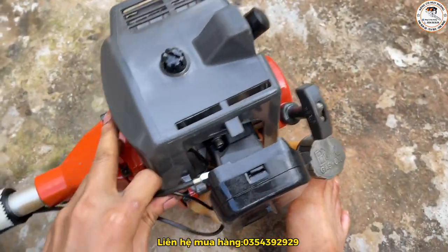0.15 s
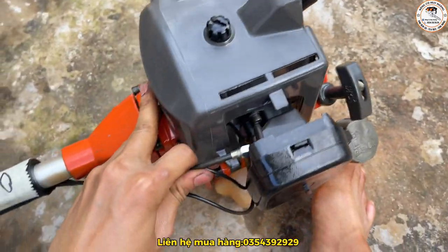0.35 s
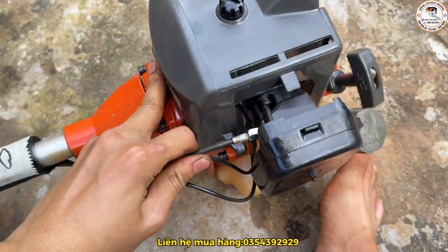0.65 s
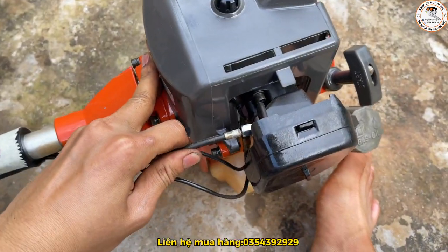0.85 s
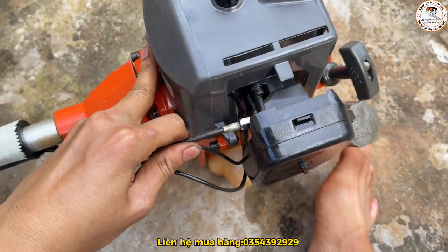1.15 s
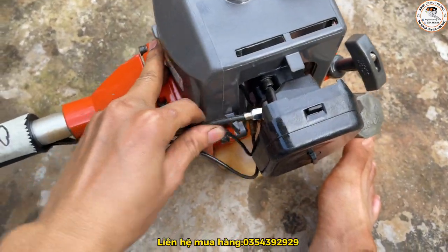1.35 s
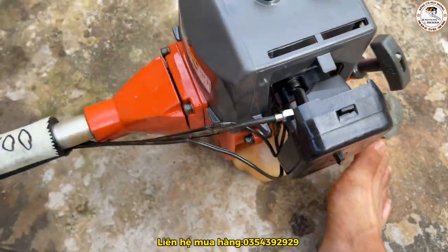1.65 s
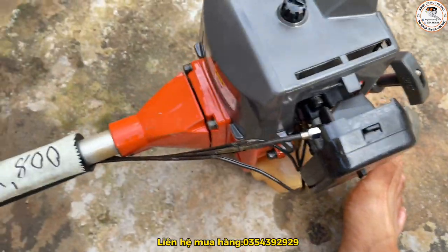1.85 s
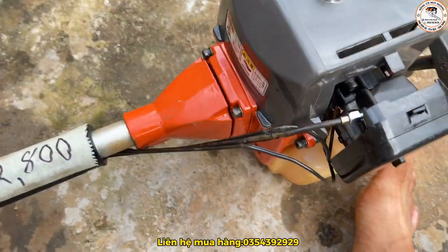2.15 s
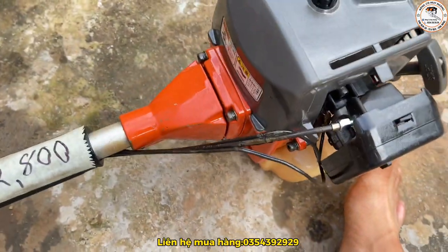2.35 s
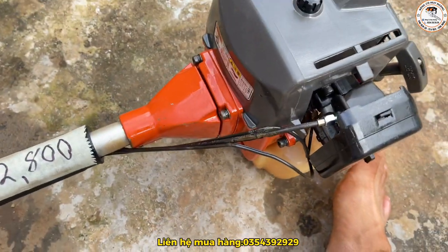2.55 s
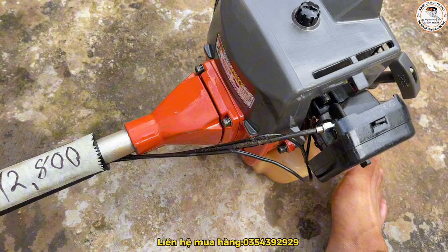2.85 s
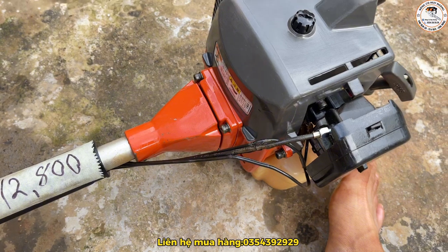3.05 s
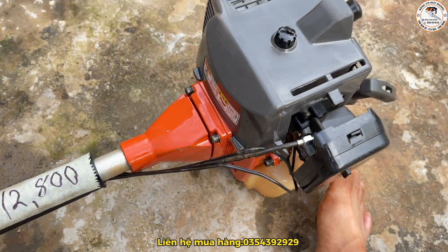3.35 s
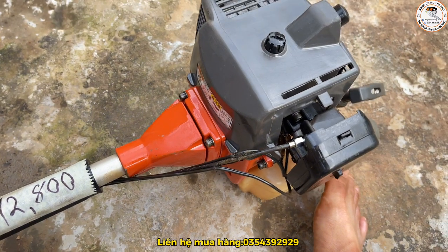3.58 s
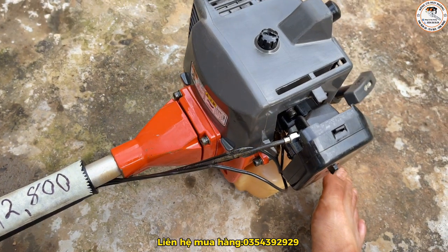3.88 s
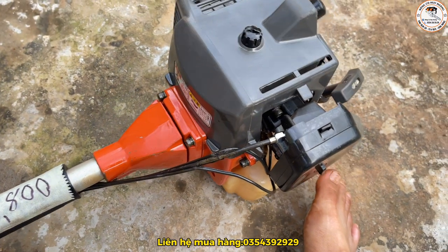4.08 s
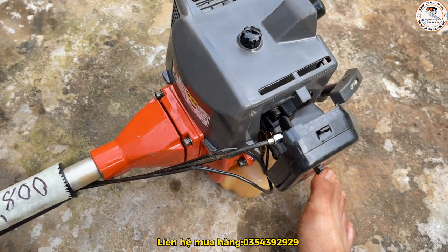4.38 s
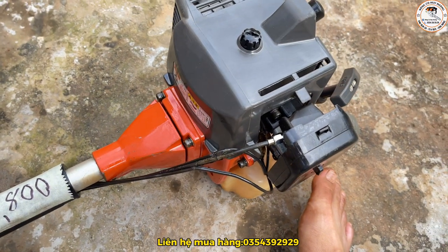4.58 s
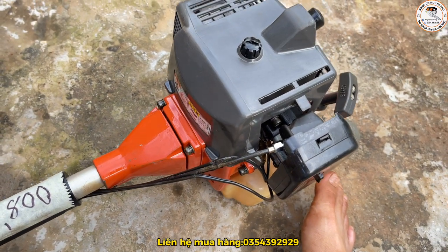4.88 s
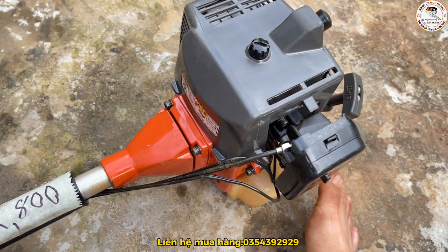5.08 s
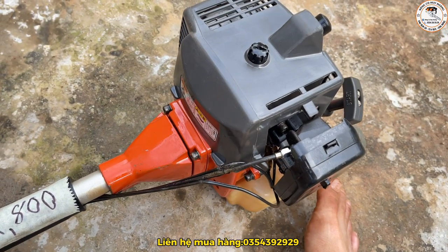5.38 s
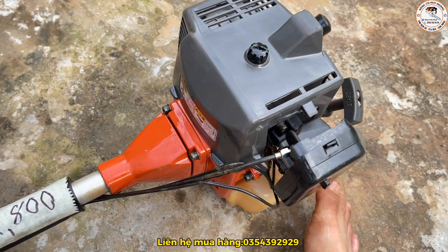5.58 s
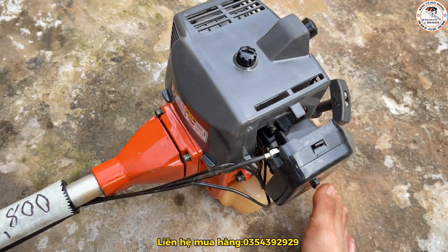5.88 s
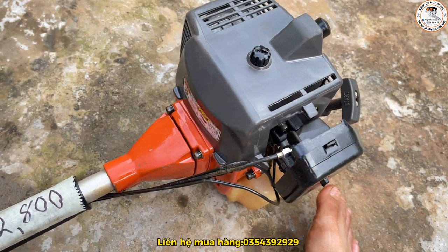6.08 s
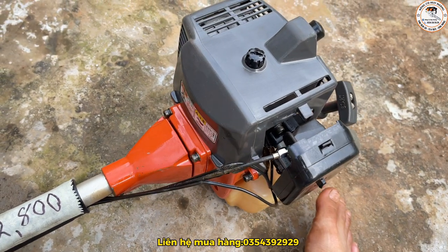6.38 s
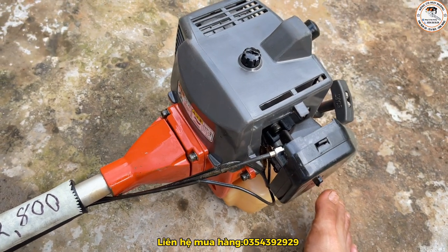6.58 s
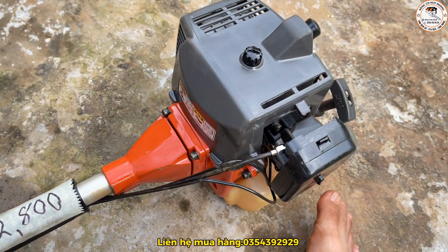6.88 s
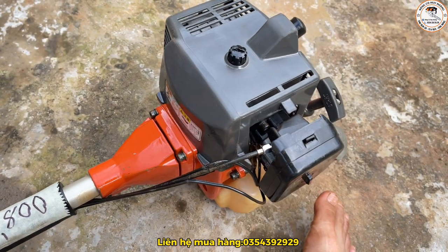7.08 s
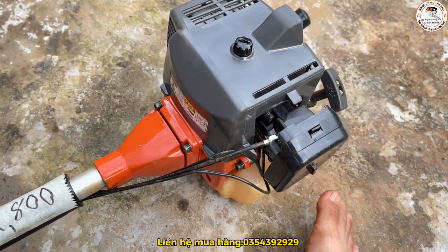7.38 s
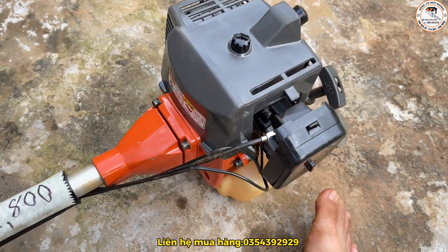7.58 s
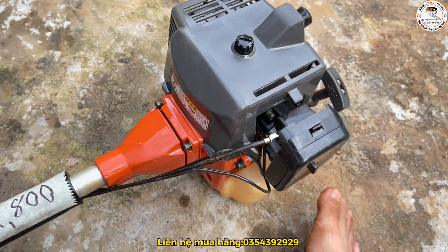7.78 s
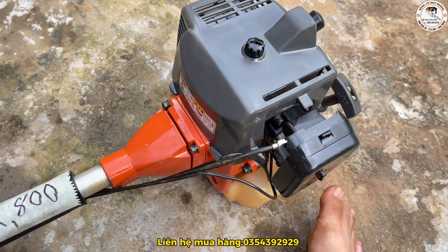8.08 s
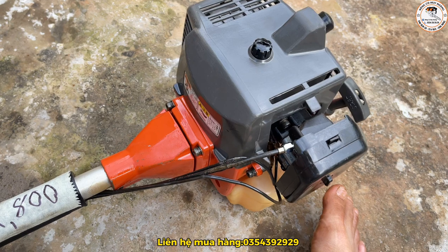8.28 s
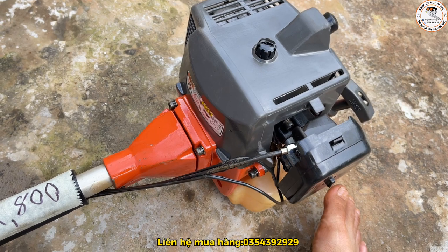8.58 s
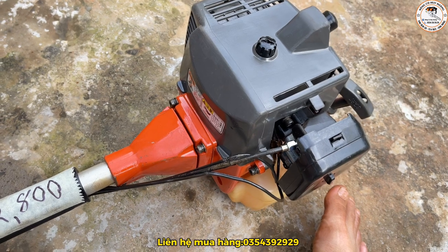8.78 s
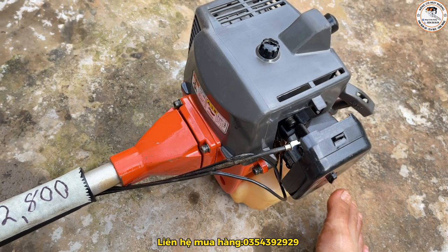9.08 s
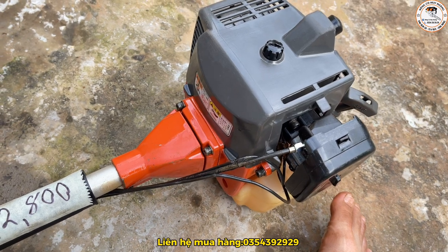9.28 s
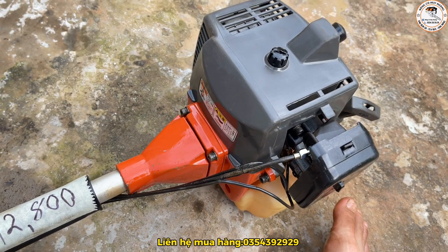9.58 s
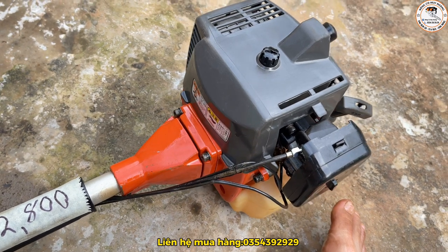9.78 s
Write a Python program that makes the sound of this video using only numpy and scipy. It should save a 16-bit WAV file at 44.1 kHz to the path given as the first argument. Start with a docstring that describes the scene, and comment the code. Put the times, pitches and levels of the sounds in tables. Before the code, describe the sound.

A small two-stroke brush cutter engine pops unevenly at idle, revs briefly, sinks to sputtering, then is opened up four times into a buzzing scream.

```python
"""On a concrete yard, a small two-stroke brush cutter is heard from close above.
It idles with uneven pops, is revved, sinks back, then is opened up four times and held at speed.
During parts of these runs it skips firings in a pattern, which adds a burble below the engine note.
One turning crankshaft times the exhaust puffs, intake gulps, piston slaps, whine and rushing gas;
filters and resonances give each its colour, and lone firings are added at listed times."""
import sys
import numpy as np
from scipy import signal
from scipy.fft import rfft, irfft, next_fast_len
from scipy.io import wavfile
from scipy.ndimage import uniform_filter1d

SR = 44100
rng = np.random.default_rng(int(sys.argv[2]) if len(sys.argv) > 2 else 0)


def to_wav(sig):
    """Store sig (one row per channel, or 1-D mono) as 16-bit WAV at the path in sys.argv[1].

    Samples outside -1..1 are clipped; the rate is SR.
    """
    pcm = np.clip(np.atleast_2d(sig), -1, 1) * 32767
    pcm = np.round(pcm).astype(np.int16)
    wavfile.write(sys.argv[1], SR, pcm.T)  # frames by channels


N = 438354
TIME = np.arange(N) / SR  # seconds
SIZE = 2 * next_fast_len(N // 2 + 8192)  # transform length, with room for filter tails
FREQS = np.maximum(np.arange(SIZE // 2 + 1) * SR / SIZE, 1)  # Hz

# Levels in these tables are relative: the mix adds further gains.
# trigger pulls: opens t/s, shuts t/s, speed the engine heads for [turns/s], then changes in level/dB
# of exhaust, intake, clatter, whine, hiss, overtones of the engine note, and the level/dB of the bark
TRIGGER_PULLS = [(0.408, 1.289, 147.2, -.5, -0.6, 0.5, -4, 1, -2.1, -4),
                 (2.181, 3.891, 186, 0.1, .5, 2.5, -2, -0.15, 1.2, 8),
                 (4.133, 5.644, 177.3, -0.27, 0, 1, 1.5, -0.96, 0.054, 0.5),
                 (5.9, 6.992, 179.7, -0.44, -0.47, 1, 2, -0.27, 0.079, -2),
                 (7.232, 9.704, 184, -2.07, 0.3, 0, -1, 0.027, 0.27, -7)]
# trigger eased or squeezed, or the engine topping out: t/s, new speed to head for [turns/s],
# one turn in so many is skipped [count, 0 for none]
SPEED_NUDGES = [(.554, 105.4, 0), (.651, 144, 0), (2.28, 132.9, 0), (2.654, 168.7, 0), (3.1, 157, 2),
                (3.32, 157, 3), (3.551, 164, 3), (4.82, 167.6, 3), (6.52, 169, 3), (7.68, 171.3, 3),
                (8.08, 172, 3), (8.3, 170.5, 3), (8.65, 181, 3), (8.8, 175.6, 3)]
# tuned exhaust with the throttle open: speed [turns/s], level/dB of crank multiples 1, 2 and 3
OPEN_NOTE = [(80, -22.5, -26, -23.5), (104, -18, -25.5, -22.5), (126, -22, -24, -26.5),
             (162, -24, -26.5, -30.5), (146, -23, -28.5, -15.5), (176.8, -25, -20, -33.5),
             (170.7, -21.5, -22.5, -37)]
# tuned exhaust with the throttle shut: speed [turns/s], level/dB of crank multiples 1, 2 and 3
SHUT_NOTE = [(58, -35, -31.5, -34.5), (73, -35, -28.5, -40), (107, -30.5, -43, -41.5),
             (121, -31, -36, -31.5), (152, -34.5, -36.5, -37)]
# how the muffler answers one puff: f/Hz, level/dB
MUFFLER_RESPONSE = [(35, -6.5), (58, 2), (115, 6), (170, 9), (228, 0), (285, 13.5), (345, 5.5), (400, 5),
                    (450, -2.5), (560, -11), (800, -13.5), (1400, -3), (3000, -34.5)]
# how the air box answers gulps and leaking air: f/Hz, level/dB
AIRBOX_RESPONSE = [(300, -31), (570, -6), (670, 0.5), (705, 10.5), (800, 11.5), (930, 3.5), (1000, 8.5),
                   (1050, 6.5), (1150, -2), (1270, 2.5), (1350, 5), (1420, -0.5), (1650, -9.5),
                   (3500, -30.5)]
# lone firings at idle and as the engine slows: t/s (before a tiny delay), crack level/dB, thump level/dB
LONE_FIRINGS = [(0.011, -18, -15), (0.079, -14, -12.5), (0.163, -17, -15.5), (0.232, -17, -16),
                (0.284, -17, -16), (0.351, -16, -14.5), (0.400, -15, -13), (0.446, -16, -15),
                (1.523, -19, -31), (1.622, -23, -28), (1.686, -25, -23), (1.801, -18, -23),
                (1.851, -22, -27), (1.878, -21, -22), (1.942, -21, -18.5), (2.006, -18.5, -20),
                (2.093, -23, -21), (2.154, -23, -22), (2.198, -22, -20)]
# low ring of a lone firing: f/Hz, level/dB
FIRING_RING = [(50, -23), (110, 5.5), (200, 6.5), (350, -2.5), (450, -26), (560, -11), (800, -23),
               (1300, -21), (1700, -27), (2300, -26), (3300, -47), (9000, -65)]
# resonances of cylinder fins and covers: f/Hz, width [Hz], level/dB
FIN_RESONANCES = [(1752, 58, -1.5), (1919, 38, 2), (2030, 35, 9.5), (2212, 32, 9.5), (2305, 170, 3.5),
                  (2767, 45, -1), (2850, 83, -17), (3630, 16, 1.5), (4230, 45, -5), (2280, 540, -20)]
# whine of the clutch: multiple of the crank rate [count], level/dB
CLUTCH_WHINE = [(9, -6.5), (10, -21), (11, -12), (12, -9.5), (13, -5.5), (14, -19), (15, -22), (17, -39)]
# blade tone of the flywheel fan: speed [turns/s], level/dB within the whine
FAN_TONE = [(95, -6), (115, 0.5), (136, -2), (150, -23), (165, -7.5), (176, -11)]
# rush of gas and cooling air: f/Hz, level/dB
RUSH_COLOUR = [(150, -2), (300, -14.5), (420, 3.5), (560, -14), (760, -5), (1100, -2.5), (1400, -3),
               (1650, -2.5), (2200, -4.5), (2800, -6), (3300, -14.5), (6000, -18.5)]
# treble hiss of gas and air: f/Hz, level/dB
HISS_COLOUR = [(1500, -24.5), (3000, 2), (4400, 3.5), (5300, 0), (7000, -1), (8300, 0.5), (9200, 5),
               (9700, -3.5), (10200, -27), (10800, -1), (11700, 1), (12600, -11)]
# how each source follows the engine, by name: level/dB throttle open, level/dB throttle shut,
# change per octave of speed [dB], then change in level/dB at idle, skipping one in three, one in two
SOURCE_LEVELS = {"exhaust": (-26.5, -32, 6, 4, -2.5, 2), "intake": (-23, -34.5, -3.5, -7.5, 0.5, 0),
                 "clatter": (-28, -30.5, 1, -3.5, 0.5, -2), "whine": (-32, -35, 5, -1, 2, -5),
                 "hiss": (-37, -39, 0, -2.5, 1.5, 1.5)}
# engine level as the microphone moves about above it: t/s, level/dB
MIC_NEARNESS = [(0, 4), (.83, 4.5), (1.3, 5), (1.6, 0), (2.1, -0.5), (2.7, 2.5), (3.22, 4), (3.42, 1.5),
                (4.15, -2), (4.9, 0.5), (5.55, -0.8), (6.0, -3), (6.9, -2), (8.4, -1.5), (9.9, -1)]
# reflections from the covers and the concrete: delay [s], gain [ratio]
REFLECTIONS = [(.00104, 0.055), (.0031, 0.23), (.0047, 0.13), (.0069, -0.2), (.0094, 0.09)]
# width of the microphone pair: f/Hz, side against mid level/dB
STEREO_WIDTH = [(60, -37), (260, -27), (420, -14.5), (680, -7), (1100, -8), (1780, -10), (2890, 4),
                (4690, -0.5), (7000, -7.5), (9200, -1.5), (10800, 12), (12300, -89)]
# lean of the microphone pair: f/Hz, left against right level/dB
STEREO_LEAN = [(60, 1), (97, 2), (160, 1.5), (260, 0.5), (420, 0.5), (680, -3.5), (1100, 5.5), (1780, -1.5),
               (2890, -4), (4690, -1.5), (7600, 0.5), (12300, 0.0)]

IDLE_SPEED, COAST_TOWARD_SPEED, USUAL_SPEED = 58, 28.25, 150  # turns per second
SPEED_LAG_S, COAST_LAG_S = .374, .78  # time constants of the flywheel
# the exhaust answers the throttle at once, the intake honk blooms later; both lead the flywheel
OPEN_S, BLOOM_S, SHUT_S, OPEN_LEAD_S, SHUT_LEAD_S = 0.1, 0.26, 0.093, 0.031, 0.055
STUMBLE_S = .13  # just after opening, only every other turn fires
WANDER_DB, WANDER_STEP_S = 0.94, .12


def exhaust(times, skips, idling):
    """One puff a turn enters the muffler: weak when unburnt, uneven with a flutter of gas at idle."""
    sizes = from_db(-8.5 * skips) * scatter(times, 0.51 + 2.5 * idling)
    puffs = clicks(stagger(times, .00003 + 0.0008 * idling), sizes)
    spill = clicks(times, 0.049 * sizes * idling)
    flutter = fade(spill, decay_s=.014) * rng.standard_normal(N)
    return even(through(puffs + flutter, MUFFLER_RESPONSE))


def engine_note(x, angle, levels_db):
    """The tuned exhaust makes the lowest multiples of the crank rate swell and sink with load."""
    for multiple, db in enumerate(levels_db, 1):
        rotor = np.exp(1j * multiple * angle)
        present = 2 * (smooth(x * rotor.real) - 1j * smooth(x * rotor.imag))
        wanted = np.sqrt(2) * from_db(db) * present / (abs(present) + 1e-9)  # same phase, new level
        x = x + np.real((wanted - present) * rotor)
    return x


def intake(times, skips, throttle, lugging):
    """Open, one gulp a turn rings the air box, deeper at low revs; nearly shut, it only rushes."""
    sizes = from_db(-5.0 * skips) * scatter(times, spread_db=0.6)
    gulps = clicks(stagger(times - .0008, spread_s=.00002), sizes)  # just before the exhaust puff
    gulps = duct(gulps, round_trip_s=0.002369, bounce=0.3)
    deep_ring = from_db(13.0) * resonate(gulps, hz=654, width_hz=13)
    honk = even(through(gulps, AIRBOX_RESPONSE) + lugging * deep_ring)
    leak = jet(times, skips, AIRBOX_RESPONSE, steady=0.043, decay_s=0.0022, spread_db=1.5)
    return throttle * honk + from_db(-3.0) * (1 - throttle) * leak


def duct(x, round_trip_s, bounce):
    """A pulse bounces in a short duct and spreads over the turn, its spectrum unchanged."""
    loop = np.zeros(round(round_trip_s * SR) + 1)
    loop[0], loop[-1] = 1, -bounce
    return signal.lfilter(loop[::-1], loop, x)


def bark(times, idle):
    """The first deep gulps of a rev ring the air box on its main note, if the engine is above idle."""
    corners = np.cumsum([0, 0.013, 0.12, 0.091])  # attack, hold and release in seconds
    envelope = 0
    for start, *_, db in TRIGGER_PULLS:
        envelope = envelope + from_db(db) * np.interp(TIME - start, corners, [0, 1, 1, 0])
    ring = resonate(clicks(times, scatter(times, spread_db=0.5)), hz=809, width_hz=81)
    return from_db(-32) * (1 - idle) * envelope * even(ring)


def pops():
    """A lone firing thumps the muffler, rings the fins and leaves a short spit of gas."""
    at, crack_db, thump_db = np.transpose(LONE_FIRINGS)
    thumps = clicks(at + 0.00234, from_db(thump_db))
    cracks = clicks(at + 0.00102, from_db(crack_db))
    spit = fade(cracks, decay_s=0.0057) * rng.standard_normal(N)
    ring = sum(from_db(db) * resonate(cracks, hz, width_hz) for hz, width_hz, db in FIN_RESONANCES)
    body = from_db(39) * through(thumps, FIRING_RING) + from_db(24) * ring
    gas = from_db(4.5) * through(spit, RUSH_COLOUR) + from_db(-7) * through(spit, HISS_COLOUR)
    return body + gas


def clatter(times, skips, idling):
    """The piston slaps at both ends of its stroke and rings the fins, most loosely at idle."""
    top = stagger(times, .000018 + 0.00013 * idling)
    bottom = stagger(times[:-1] + .45 * np.diff(times), spread_s=.00008)
    out = 0
    for k, (hz, width_hz, db) in enumerate(FIN_RESONANCES):
        slaps = clicks(top, from_db(-4.0 * skips) * scatter(top, spread_db=5.0))
        slaps = slaps + clicks(bottom, 0.49 * scatter(bottom, spread_db=8.0))
        out = out + (-1) ** k * from_db(db) * resonate(slaps, hz, width_hz)  # alternating signs
    return even(out)


def fin_ring():
    """Constant shaking, made of noise, keeps the longest cooling fin ringing."""
    return even(resonate(rng.standard_normal(N), hz=2225, width_hz=55))


def whine(angle, fan_db):
    """Sixteen fan blades and the clutch sing at crank multiples; high ones ring a thin cover."""
    fan = flutter_gain() * np.sin(16 * angle)
    clutch = sum(from_db(db) * flutter_gain() * np.sin(k * angle) for k, db in CLUTCH_WHINE)
    buzz = sum(flutter_gain() * np.sin(k * angle) for k in range(21, 27))
    cover = resonate(buzz, hz=3690, width_hz=52) + from_db(-2) * resonate(buzz, hz=4350, width_hz=65)
    return from_db(fan_db) * fan + clutch + from_db(-12.0) * cover


def flutter_gain():
    """Smoothed noise makes a tone's strength waver around 1."""
    return 1 + .35 * even(smooth(rng.standard_normal(N)))


def jet(times, skips, colour, steady, decay_s, spread_db):
    """Turbulent gas is noise: a steady stream plus a spurt at every opening of the port."""
    spurts = fade(clicks(times, from_db(-5.0 * skips) * scatter(times, spread_db)), decay_s)
    noise = even(steady + spurts) * rng.standard_normal(N)
    return even(reflect(through(noise, colour)))


def reflect(x):
    """Close surfaces send back delayed copies that comb the treble."""
    out = x
    for delay_s, gain in REFLECTIONS:
        out = out + gain * np.interp(TIME - round(delay_s * SR) / SR, TIME, x, left=0)
    return out


def crank_speed():
    """The flywheel nears the speed the trigger asks for exponentially, and coasts down more slowly."""
    moves = [(start, aim, SPEED_LAG_S) for start, _, aim, *_ in TRIGGER_PULLS]
    moves += [(at, aim, SPEED_LAG_S) for at, aim, _ in SPEED_NUDGES]
    moves += [(shut, COAST_TOWARD_SPEED, COAST_LAG_S) for _, shut, *_ in TRIGGER_PULLS]
    speed = np.full(N, float(IDLE_SPEED))
    for at, aim, lag_s in sorted(moves):
        i = int(at * SR)
        speed[i:] = aim + (speed[i] - aim) * np.exp(-TIME[:N - i] / lag_s)
    return speed


def openings(attack_s):
    """Throttle opening from 0 to 1 for each trigger pull: attack, hold, release."""
    rows = []
    for start, shut, *_ in TRIGGER_PULLS:
        rise = np.clip((TIME - start + OPEN_LEAD_S) / attack_s, 0, 1)
        fall = np.clip(1 - (TIME - shut + SHUT_LEAD_S) / SHUT_S, 0, 1)
        rows.append(rise * fall)
    return np.array(rows)


def skip_stretches():
    """List (start s, end s, one turn in so many): stumbles on opening, and skipping when topped out."""
    moves = [at for at, *_ in SPEED_NUDGES] + [shut for _, shut, *_ in TRIGGER_PULLS]
    # topping out lasts until the trigger table's next move
    topped = [(at, min(m for m in moves if m > at), every) for at, _, every in SPEED_NUDGES if every]
    return topped + [(start, start + STUMBLE_S, 2) for start, *_ in TRIGGER_PULLS]


def skipped(times):
    """How far each turn's charge fails to burn: 1 in the pattern, about half for stray turns."""
    count = np.arange(len(times))
    pattern, locked = np.zeros(len(times)), np.zeros(len(times))
    for start, end, every in skip_stretches():
        inside = (times > start) & (times < end)
        pattern += inside & (count % every == 0)
        locked += inside & (every > 2)
    stray = (rng.random(len(times)) < .13) * (1 - locked)  # none within the one-in-three beat
    return np.maximum(pattern, 0.52 * stray)


def skip_amount(wanted):
    """Smoothed 0-1 curve of the stretches whose skip spacing is wanted."""
    chosen = [(start, end) for start, end, every in skip_stretches() if wanted(every)]
    return smooth(sum(1.0 * ((TIME > start) & (TIME < end)) for start, end in chosen))


def levels(speed, idle, opening):
    """Throttle, speed and skipping set the dB level of each source and of the engine note."""
    load = opening.sum(axis=0)
    near_db = along(MIC_NEARNESS, TIME)[0]
    skipping = skip_amount(lambda every: every > 2)
    stumbling = skip_amount(lambda every: every == 2)
    state = np.array([load, 1 - load, np.log2(speed / USUAL_SPEED), idle, skipping, stumbling])
    *extras_db, overtones_db, _ = np.transpose(TRIGGER_PULLS)[3:] @ opening
    db = {}
    for (name, law), extra_db in zip(SOURCE_LEVELS.items(), extras_db):
        db[name] = near_db + np.array(law) @ state + extra_db + wander()
    db["note"] = near_db + load * along(OPEN_NOTE, speed) + (1 - load) * along(SHUT_NOTE, speed)
    db["note"][0] += -3 * skipping  # skipped firings weaken the fundamental
    db["note"][1:] += overtones_db
    return db


def wander():
    """A slow chance swing in dB, drawn as straight lines between random points."""
    knots = rng.standard_normal(400)
    return WANDER_DB * np.interp(TIME / WANDER_STEP_S, np.arange(len(knots)), knots)


def from_db(db):
    """Turn decibels into gain."""
    return 10 ** (np.asarray(db) / 20)


def along(rows, control):
    """Each further column of a table, read where its first column equals the control."""
    at, *columns = np.transpose(rows)
    return np.array([np.interp(control, at, column) for column in columns])


def gains(points):
    """Turn a (f/Hz, level/dB) table into a gain at every frequency."""
    hz, db = np.transpose(points)
    return from_db(np.interp(np.log(FREQS), np.log(hz), db))


def through(x, points):
    """Filter with the given response, reacting as early as it can and falling off at both ends."""
    low_end = (points[0][0] / 10, points[0][1] - 60)
    high_end = (points[-1][0] * 2, points[-1][1] - 20)
    # folding the cepstrum forward in time gives the minimum-phase filter
    cepstrum = irfft(np.log(gains([low_end, *points, high_end])))
    cepstrum[1:SIZE // 2] *= 2
    cepstrum[SIZE // 2 + 1:] = 0
    return irfft(rfft(x, SIZE) * np.exp(rfft(cepstrum)))[:N]


def resonate(x, hz, width_hz):
    """One resonance with gain 1 at its peak; a narrower one rings longer."""
    r = np.exp(-np.pi * width_hz / SR)
    feed = np.array([1, 0, -1]) * (1 - r * r) / 2
    back = [1, -2 * r * np.cos(2 * np.pi * hz / SR), r * r]
    return signal.lfilter(feed, back, x + 1e-18)


def smooth(x):
    """Average over several turns, twice."""
    return uniform_filter1d(uniform_filter1d(x, size=2200), size=2200)


def even(x):
    """Hold the running rms level at 1."""
    return x / np.sqrt(np.maximum(smooth(x * x), 1e-16))


def clicks(times, sizes):
    """Impulses placed between samples by sharing each over two neighbours."""
    at, out = np.clip(times * SR, 0, N - 2), np.zeros(N)
    np.add.at(out, at.astype(int), sizes * (1 - at % 1))
    np.add.at(out, at.astype(int) + 1, sizes * (at % 1))
    return out


def fade(x, decay_s):
    """Each impulse dies away exponentially from its own height."""
    return signal.lfilter([1], [1, -np.exp(-1 / (decay_s * SR))], x + 1e-18)


def scatter(times, spread_db):
    """Chance strength of each turn, without freak peaks."""
    return from_db(spread_db * np.clip(rng.standard_normal(len(times)), -2, 2))


def stagger(times, spread_s):
    """Chance earliness or lateness of each turn."""
    return times + spread_s * rng.standard_normal(len(times))


def microphones(direct, diffuse):
    """Sound reaches the left port first, shifting the side a quarter cycle; scattered sound adds width."""
    mid = rfft(direct, SIZE)
    port_lag_s = .000136
    quarter_cycle = 1j * np.sign(np.sin(2 * np.pi * FREQS * port_lag_s))
    side = gains(STEREO_WIDTH) * (quarter_cycle * mid + rfft(diffuse, SIZE))
    lean = np.sqrt(gains(STEREO_LEAN))  # half the lean on each channel
    return irfft([(mid + side) * lean, (mid - side) / lean])[:, :N]


def scene():
    """The throttle drives the crankshaft, and the crankshaft times the engine's sources."""
    speed, opening = crank_speed(), openings(OPEN_S)
    turns = np.cumsum(speed) / SR
    angle = 2 * np.pi * turns
    times = np.interp(np.arange(1, int(turns[-1])), turns, TIME)  # one moment per turn
    skips = skipped(times)
    idle = np.interp(speed, [65, 100], [1, 0])
    idling = np.interp(times, TIME, idle)
    db = levels(speed, idle, opening)
    throttle = np.interp(openings(BLOOM_S).sum(axis=0), [0, 1], [.06, 1])  # never fully shut
    lugging = np.interp(speed, [130, 145], [1, 0])  # 1 at low revs

    puffs = from_db(db["exhaust"] + 5.5) * exhaust(times, skips, idling)
    muffler = engine_note(puffs, angle, db["note"])
    honk = from_db(db["intake"] - 1.08) * intake(times, skips, throttle, lugging) + bark(times, idle)

    metal = from_db(db["clatter"] - 5.0) * clatter(times, skips, idling)
    fan_db = along(FAN_TONE, speed)[0] - 0.5 * (1 - throttle)  # weaker off the throttle
    metal += from_db(db["whine"]) * whine(angle, fan_db)
    ring_amount = np.maximum(lugging, 1 - throttle)  # freest at low revs or off the throttle
    metal += from_db(db["clatter"] - 10.5) * ring_amount * fin_ring()

    # each noise is drawn twice: once direct, once scattered
    rush, far_rush = (from_db(db["clatter"] - 4.0)
                      * jet(times, skips, RUSH_COLOUR, steady=1.0, decay_s=0.0023, spread_db=2.0)
                      for _ in range(2))
    hiss, far_hiss = (from_db(db["hiss"] + 1.5)
                      * jet(times, skips, HISS_COLOUR, steady=0.59, decay_s=0.012, spread_db=3.5)
                      for _ in range(2))
    direct = muffler + honk + metal + rush + hiss + pops()
    return microphones(direct, 1.86 * far_rush + 0.99 * far_hiss)


def record(dry):
    """The loudest peaks are rounded and the top treble is cut."""
    rounded = dry / (1 + (dry / .94) ** 6) ** (1 / 6)
    treble_cut = signal.cheby2(14, 70, 13900, fs=SR, output="sos")  # 70 dB down from 13900 Hz up
    return signal.sosfilt(treble_cut, rounded)


dry = scene()
out = record(dry)
to_wav(out)
```